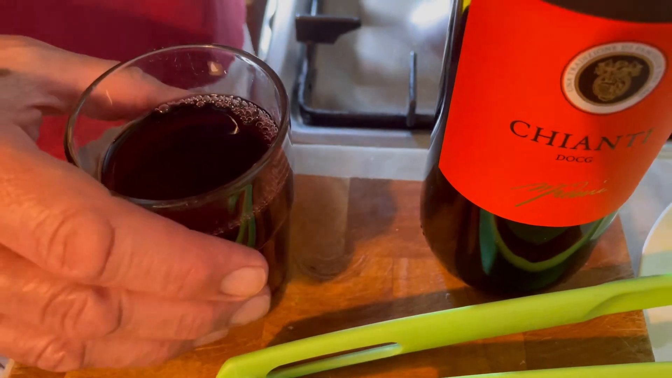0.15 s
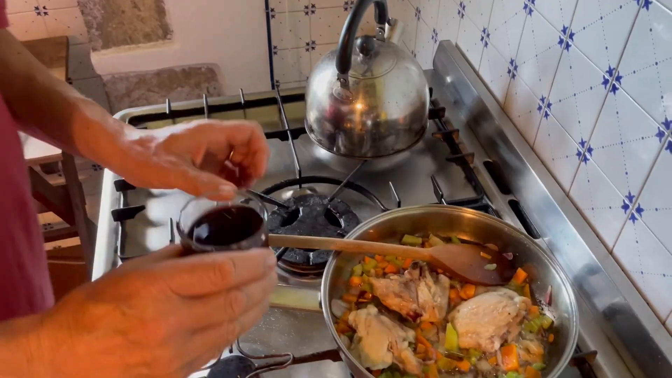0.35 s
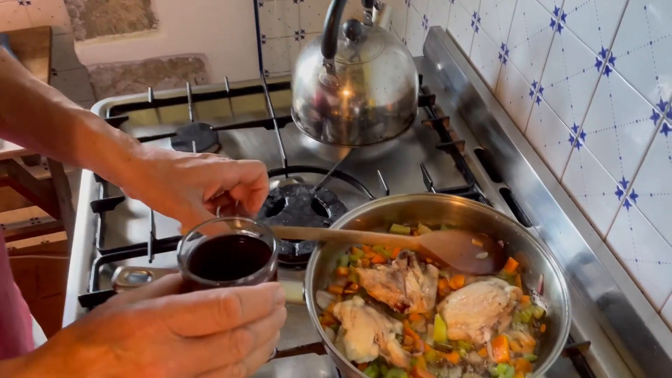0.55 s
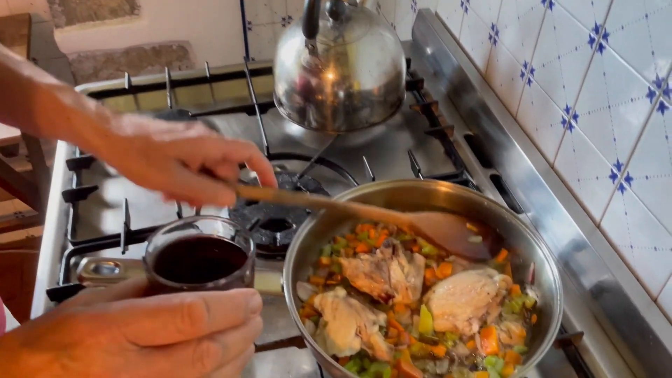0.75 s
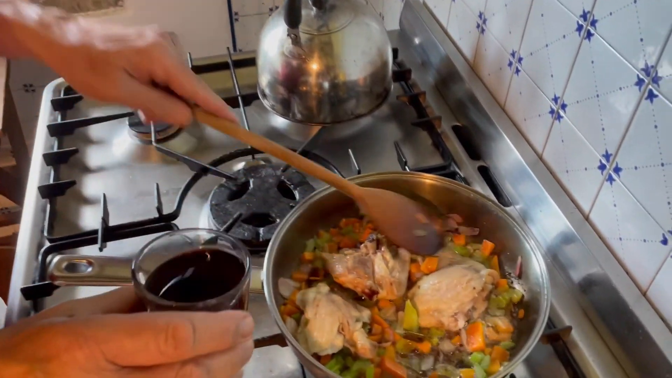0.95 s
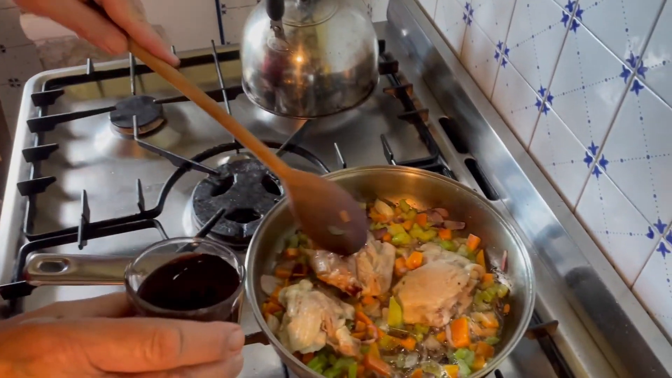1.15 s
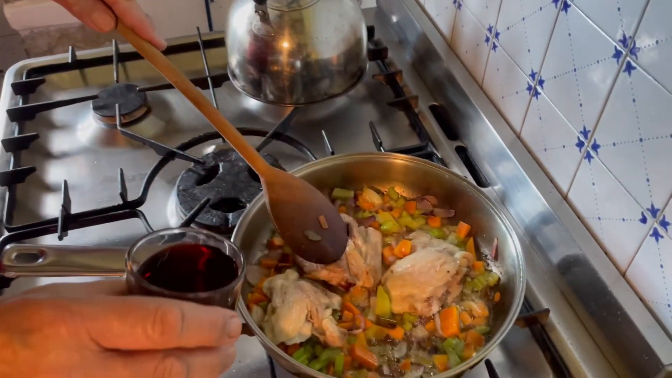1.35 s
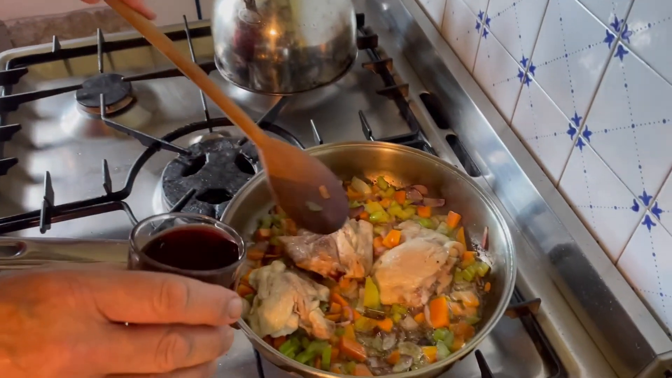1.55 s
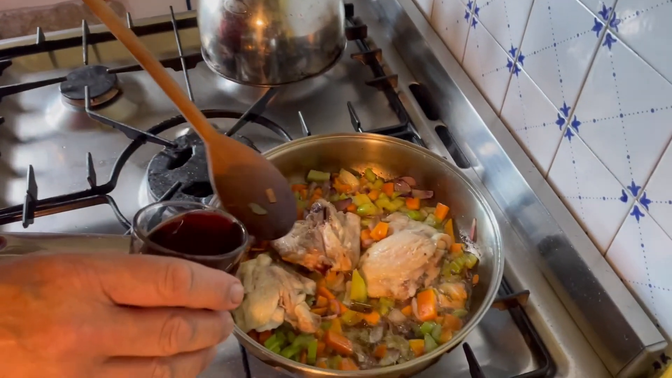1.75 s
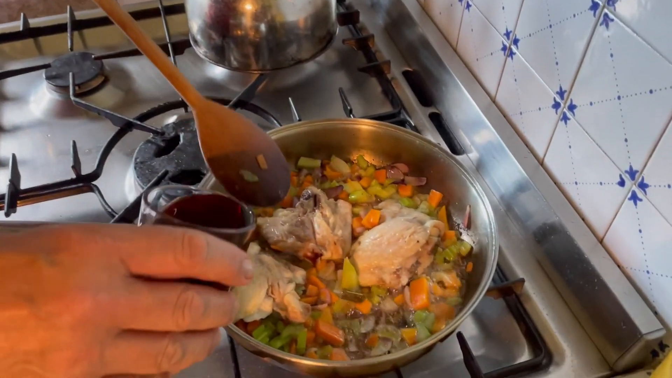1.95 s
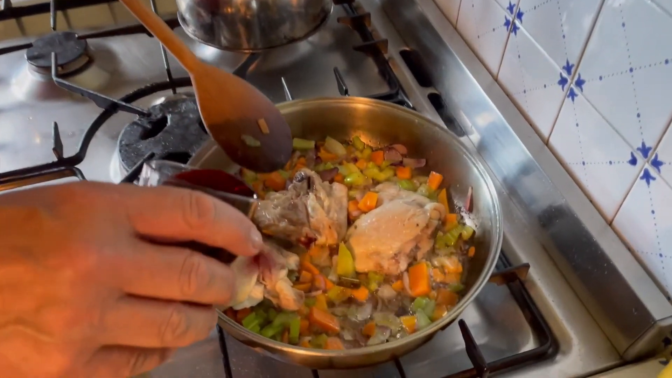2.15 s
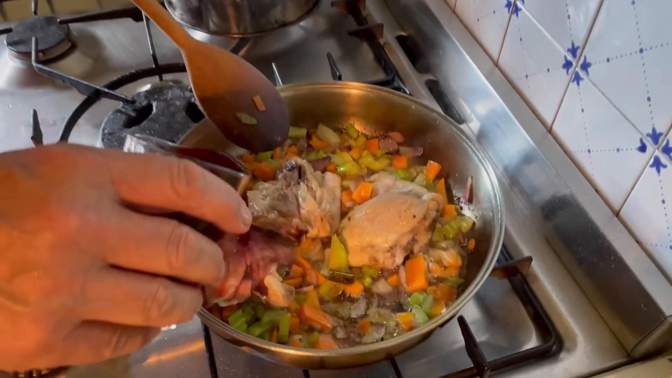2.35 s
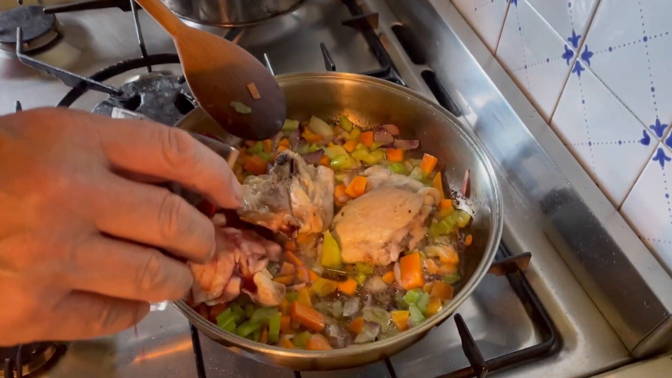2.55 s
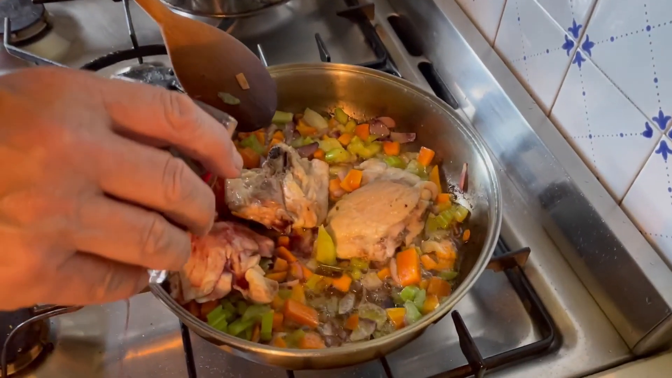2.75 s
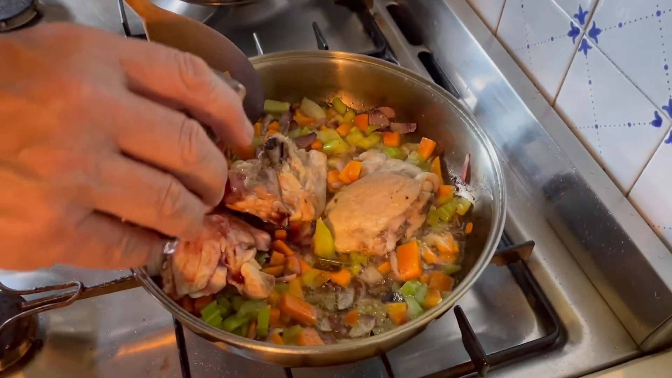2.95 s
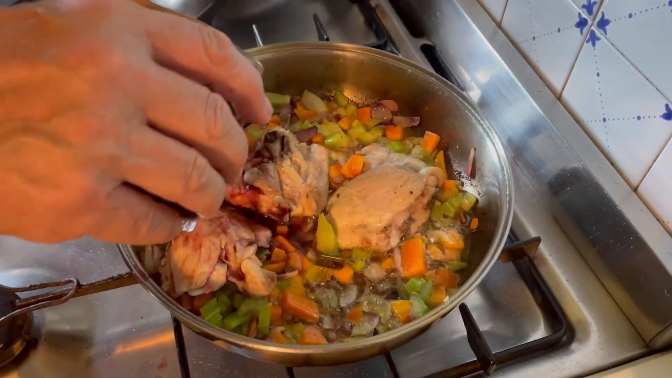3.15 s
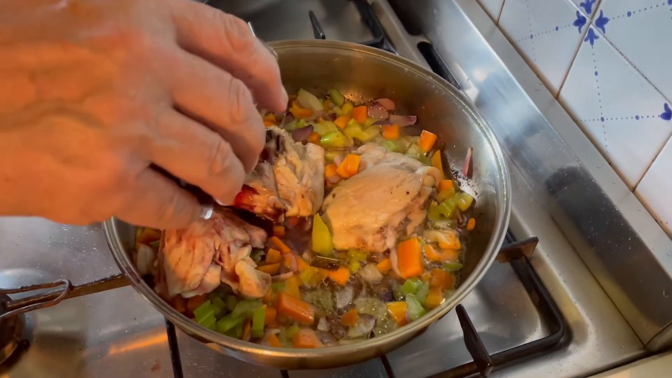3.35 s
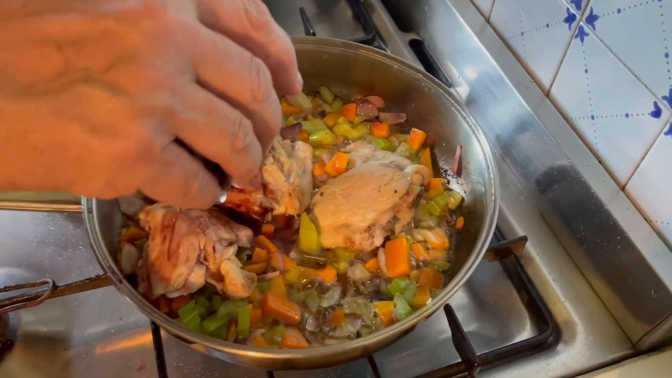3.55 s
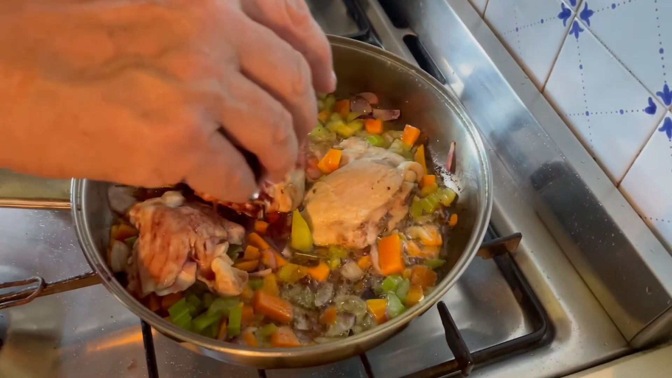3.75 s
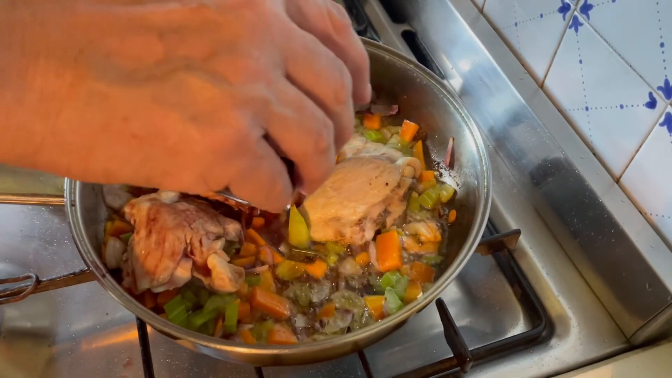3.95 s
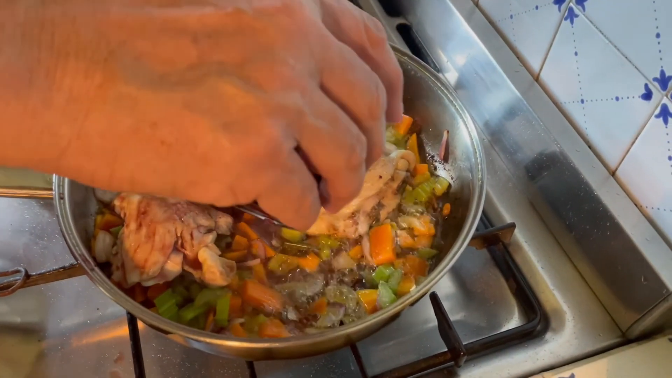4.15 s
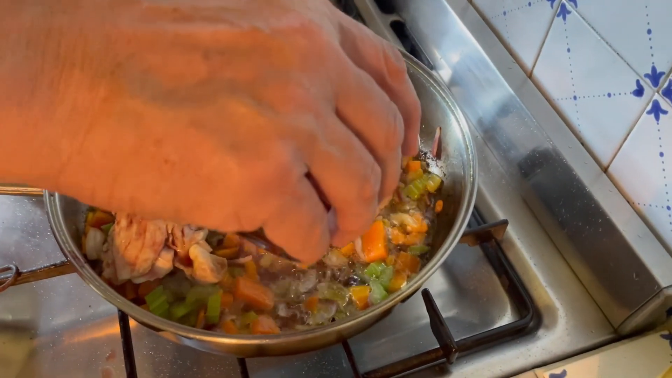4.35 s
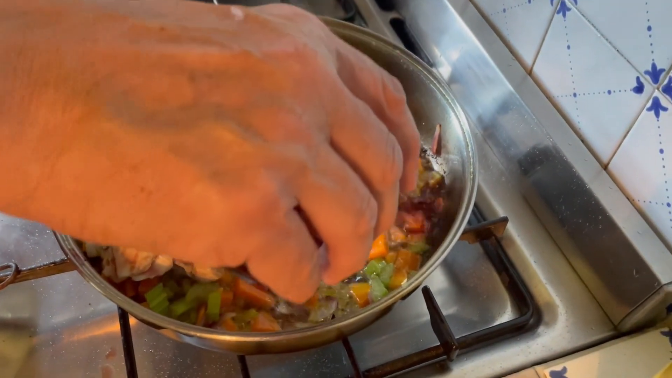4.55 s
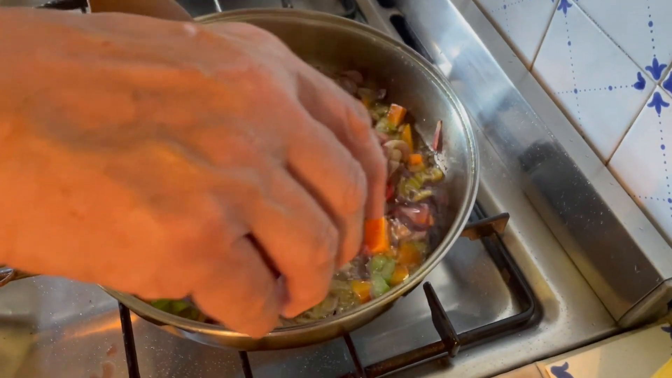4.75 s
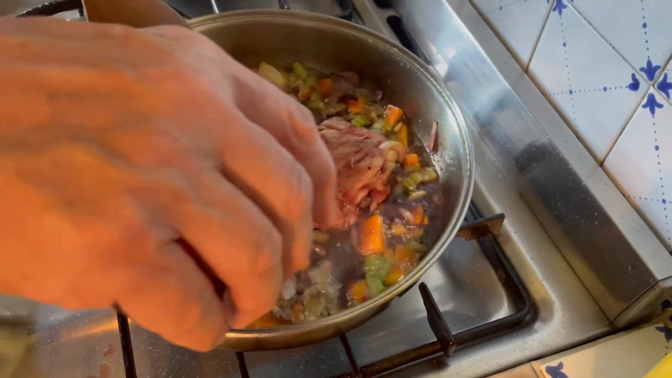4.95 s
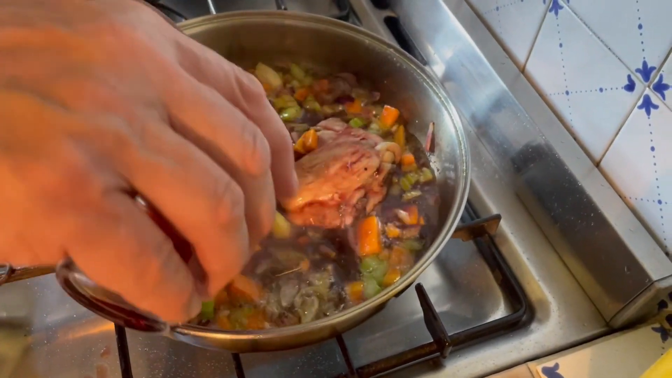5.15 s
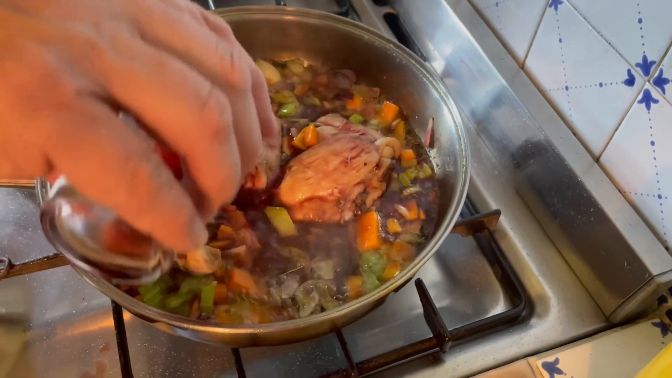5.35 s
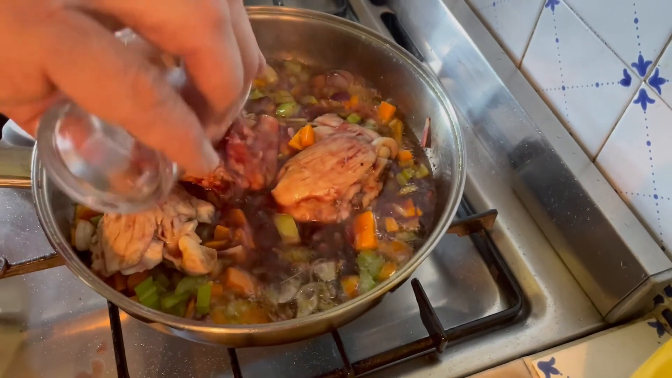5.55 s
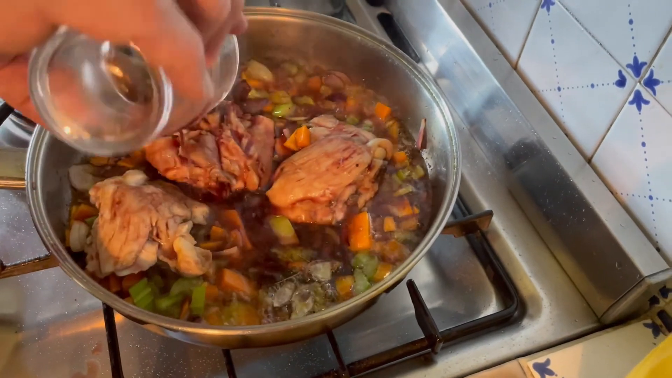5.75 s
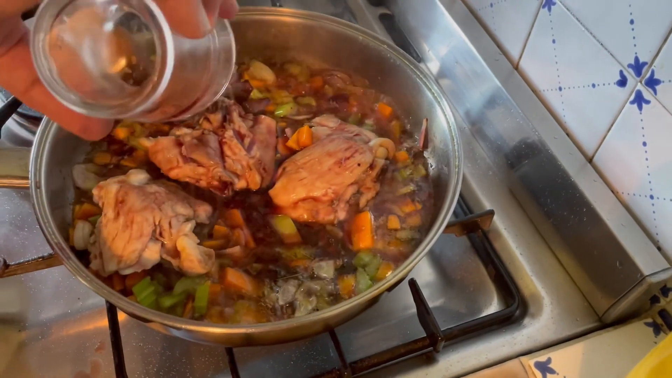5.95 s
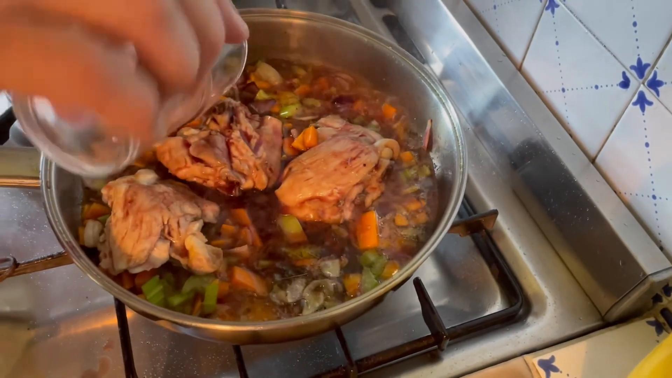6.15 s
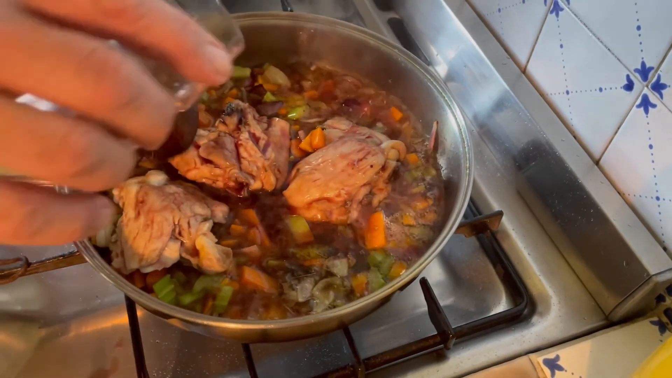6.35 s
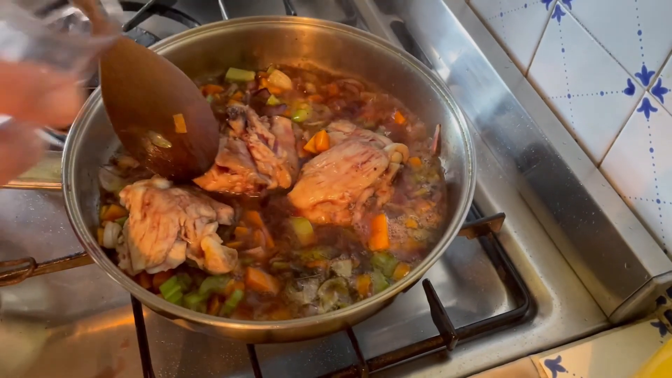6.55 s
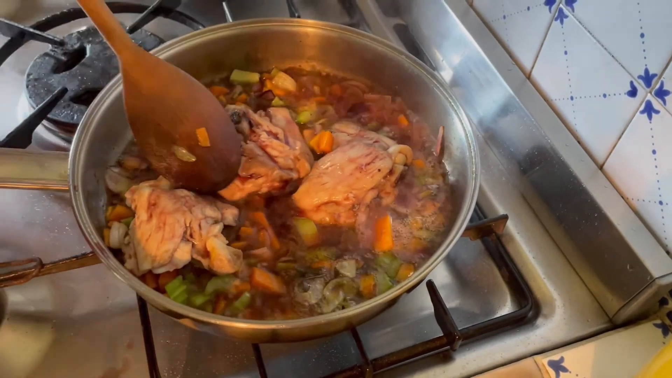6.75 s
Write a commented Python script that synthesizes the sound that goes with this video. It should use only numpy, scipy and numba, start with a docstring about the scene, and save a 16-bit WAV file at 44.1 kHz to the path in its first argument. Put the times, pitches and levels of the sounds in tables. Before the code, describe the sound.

Chicken and chopped vegetables crackle and pop in a hot pan, then wine is poured in and it erupts into a loud, fizzing boil.

```python
"""Meat and vegetables fry in a hot steel pan, close to a phone in a kitchen: swarms of bubble bursts over
filtered noise, the low rumble, drone and hum of flame and room; fat crackles, pops and spits in short rings.
A low thud and wide dry ticks come by; thin squeals of steam, sliding bands of hiss, come around and after the pour.
Wine lands at 2.87 s and boils up from low gurgle to fine fizz: the swarms swell, the pops turn to snaps.
Late on, steam feeds the finest fizz while the spits grow loud enough to clip."""
import sys
import numpy as np
from scipy import signal
from scipy.fft import rfft, irfft
from scipy.io import wavfile
from scipy.ndimage import uniform_filter1d
from numba import njit

SR = 44100
rng = np.random.default_rng(int(sys.argv[2]) if len(sys.argv) > 2 else 0)


def wav_record(signal):
    """Record a signal, one row per channel, as 16-bit PCM in the file named by sys.argv[1]."""
    frames = np.transpose(np.atleast_2d(signal))
    bounded = np.clip(frames, -1, 1)
    # unit amplitude maps onto the largest positive 16-bit level
    quanta = np.round(bounded * 32767).astype(np.int16)
    wavfile.write(sys.argv[1], SR, quanta)


N = 299880
TIME = np.arange(N) / SR
HZ = np.arange(N // 2 + 1) * SR / N + 1e-3  # nudged off zero for the logarithm

# low noise of flame and room, perhaps with distant traffic:
# t/s, deep rumble level/dB, drone level/dB, hum level/dB
LOW_LEVELS = [(0, -40.5, -42, -42.5), (1.4, -44, -46.5, -43), (2.7, -49.5, -44, -44),
              (3.2, -53, -41.5, -46), (3.5, -51, -51, -34), (4.1, -47, -40, -38.5),
              (4.9, -50, -40.5, -38.5), (6.0, -50, -45.5, -37), (6.8, -55, -46.5, -40)]
# resonances that colour each low band: f/Hz, width/Hz, level/dB
RUMBLE_MODES = [(46.2, 9, 0)]
DRONE_MODES = [(80.4, 15, -2.5), (102, 24, -4.5)]
HUM_MODES = [(130.1, 10, 4), (179, 160, -10)]
# bubble sizes, large to small: level band low f/Hz, high f/Hz, middle f/Hz, pitch spread/octaves,
# length/cycles, size scatter/dB before the fry or wine factor, flicker/dB, pitch wander/octaves
BUBBLE_SIZES = [(198, 810, 380, 0.413, 4.85, 2., 1., 0.053), (670, 5400, 1333, 0.34, 6, 2, 0.34, .02),
                (1630, 8100, 2180, 0.23, 7.9, 2, 0.5, .02), (2540, 12600, 3277, 0.29, 6.3, 5, 0.73, 0.059),
                (5130, 6320, 6990, 0.27, 5, 2.5, 1.8, .06), (11500, 14400, 11940, 0.41, 1.88, 5, 1.6, .05)]
# how each size follows frying, wine and steam: frying level/dB, its drift/(dB per s),
# boiling level/dB, share of wine curve/ratio, share of steam curve/ratio
SIZE_LEVELS = [(-49.5, -1, -29, 0.71, 0.2), (-40, 0.13, -21.5, 0.86, 0.0357), (-44.5, 0.1, -21, 1.7, 0.11),
               (-37.5, -0.13, -22, 1, 0.26), (-44, 1, -22.5, 0.77, 0.38), (-54.5, 2, -22.5, -0.33, 1.48)]
# frying in fat, on top of each size's frying level: t/s, level/dB
FRYING = [(0, -1), (.26, -4), (.3, 0.5), (1.5, 1.5), (1.57, -1.5), (2.6, -1.5), (3.0, 2), (4.4, 4.5)]
# boil as the wine spreads over the hot steel, before each size's share: t/s, level/dB
WINE_BOIL = [(2.82, -41), (2.88, -20), (3.1, -14), (3.3, -6), (3.92, -3.5), (4.02, -2), (4.8, -2),
             (5.05, 0.5), (6.19, -.5), (6.22, -2.5), (6.8, -4.5)]
# steam flashing off at the dry rim, before each size's share: t/s, level/dB
RIM_STEAM = [(3.4, -30.5), (4.2, -24), (4.55, -24), (4.61, -6.5), (5.05, -11), (5.5, -6.5), (5.7, -3),
             (6.0, -1), (6.19, -2), (6.22, -5)]
# foam of the third size, coarser at first, then finer: t/s, pitch offset/octaves
FOAM_PITCH = [(3.85, -0.099), (4.0, -0.31), (4.85, -0.14), (4.97, -0.0021), (6.8, 0.034)]
# pan and stove ringing: f/Hz, width/Hz, level/dB
PAN_MODES = [(233.3, 23, 9.5), (330.5, 29, 5.5), (392.4, 20.5, 9.5), (511, 84, 8), (614, 140, 4.5),
             (723, 51, 10), (1316, 130, 3.5), (1640, 810, 3.5), (3700, 320, 1), (5600, 140, 2.5),
             (7730, 1200, -0.5)]
# fat pops, level of the ring alone: t/s, peak level/dB, f/Hz
FAT_POPS = [(0.1394, -23, 3120), (0.209, -12, 2850), (0.281, -23, 2280), (0.3515, -13, 2880),
            (0.387, -22, 2400), (0.396, -19, 2960), (0.542, -19.5, 2900), (0.573, -18.5, 2670),
            (0.6427, -13.5, 3900), (0.66, -19, 2800), (0.7147, -13.5, 2680), (0.734, -23, 2150),
            (0.774, -21, 3000), (0.793, -14, 3050), (0.8255, -18.5, 2640), (0.843, -13.5, 4040),
            (0.9243, -22, 3100), (1.0238, -17, 4700), (1.044, -17, 4230), (1.056, -11, 2820),
            (1.178, -19, 2710), (1.419, -19, 2680), (1.5194, -17, 2720), (1.6678, -20, 4110),
            (1.686, -26, 3000), (1.7468, -20, 2900), (1.775, -20, 3000), (1.783, -21, 2900),
            (1.98, -22, 3700), (2.044, -16.5, 2190), (2.178, -17, 3050), (2.1966, -9.5, 2940),
            (2.2586, -12.5, 3200), (2.272, -19, 3180), (2.287, -25, 1320), (2.669, -20, 2990),
            (2.8697, -13, 4870), (2.887, -12.5, 3300), (2.908, -15, 5000), (2.929, -20.5, 1920),
            (3.073, -15, 4330), (3.098, -18, 2600), (3.153, -12, 4600), (3.223, -16, 3600),
            (3.304, -21, 3450), (4.1977, -8.5, 2920)]
# sharp spits of fat: t/s, peak level/dB
FAT_SPITS = [(0.6414, -11), (1.6352, -10.5), (1.7584, -6.5), (2.154, -1), (2.598, -4), (2.6878, -7),
             (3.6795, -3), (3.7764, 2), (3.8018, -3), (4.1879, -1), (4.2223, -3), (5.0539, 8), (5.1921, 4),
             (5.5315, 10), (5.7029, 4)]
# one low thud: t/s, peak level/dB, f/Hz, length/cycles
LOW_THUD = [(.835, -21.5, 49.5, 2.1)]
# wide, dry pops of very few cycles: t/s, peak level/dB, f/Hz
DRY_TICKS = [(1.7587, -14, 2980), (2.376, -7, 2600), (2.456, -10, 4200), (2.5224, -13, 2800),
             (2.598, -2, 3580)]
# steam squealing out from under the food, before wavering and swell:
# start t/s, length/s, first f/Hz, last f/Hz, width/Hz, level/dB
STEAM_SQUEALS = [(2.74, 0.5, 4880, 4680, 400, -33.5), (2.83, 0.17, 5100, 5250, 440, -39),
                 (2.61, 0.99, 6100, 5800, 500, -38), (3.25, 0.086, 3400, 3480, 230, -31),
                 (3.71, 0.24, 2920, 2800, 280, -31.5)]
# two microphone ports: f/Hz, phase by which left leads/rad
PORT_LEAD = [(0, 0.1), (690, 0), (2070, -0.2), (3100, 0.96), (4650, 0), (5680, 0.3), (6120, -0.8),
             (6630, -3.3), (7490, -3.2), (8180, -3.6), (10400, -6.1), (11600, -6.4), (13900, -9.3),
             (15200, -9.5)]
# f/Hz, left minus right level/dB
PORT_TILT = [(60, -1.5), (250, 1.5), (400, -3.5), (700, 4.5), (1300, 3.5), (2000, 0.4), (3500, 3.5),
             (5500, 3.5), (6300, 2), (6700, 0), (16000, 0)]
# f/Hz, likeness of the ports/0-1
PORT_LIKENESS = [(60, 1), (300, 0.97), (440, 0.85), (600, 0.49), (900, 0.38), (1300, 0.78), (2100, 0.88),
                 (3400, 0.57), (4600, 0.92), (5600, 0.66), (6250, 0.33), (6900, 1), (9500, 0.76),
                 (11000, 0.79), (12500, 0.53), (14300, 1)]

POUR_S, SOAK_S = 2.87, 0.64  # the wine lands, then soaks the pan
EVENED_SHARE = 0.22  # share of the swells of each low band that is evened out
BURSTS_PER_CYCLE = 3.0  # bursts per second for each Hz of middle pitch
FRY_SCATTER, WINE_SCATTER = 1.2, 0.79  # factors on size scatter: wine evens the bursts out
LOUDEST_DB, SURGE_DB = 20.5, 0.65  # cap on one burst; surge shared by all sizes
FOAM_EDGE_OCTAVES = 0.26  # foam sizes stay within this reach of the middle
CRACKLES_PER_S, CRACKLE_RISE_S = 200, 0.088
CRACKLE_FRY_DB, CRACKLE_WINE_DB = -26.5, -19.5  # before size and flurries
FLURRY_FRY_DB, FLURRY_WINE_DB = 2.5, 1.5
BURST_DELAY_S = 0.0003  # added to every timed burst
POP_CYCLES, WET_POP_CYCLES = 6.3, 1.9  # pops in the wine snap rather than ring
POP_MID_HZ = 3000  # dry pops above it ring fewer cycles
SNAP_DB, SNAP_CYCLES = 4, 1.26  # snap level is relative to the ring
SPIT_HZ, SPIT_CYCLES, TICK_CYCLES = 9000, 2, 1.37
ROOM_T60_S, TOP_HZ = 0.063, 15700


def undb(db):
    """Decibels to gain."""
    return 10 ** (np.asarray(db) / 20)


def over_time(table):
    """Draw a (t, value) table across every sample."""
    return np.interp(TIME, *np.transpose(table))


def over_hz(table):
    """Draw a (f, value) table across every frequency bin, on a log axis."""
    hz, value = np.transpose(table)
    return np.interp(np.log(HZ), np.log(hz + 1e-3), value)


def after_pour(s, rise_s, dry, wet):
    """Slide a setting from its dry to its wet state once the wine lands."""
    return dry + (wet - dry) * np.clip((s - POUR_S) / rise_s, 0, 1)


def walk(rate):
    """Random levels, one every 1 / rate s, slewed into each other; spread near 1."""
    k = int(SR / rate)
    held = np.repeat(rng.standard_normal(N // k + 1), k)
    return uniform_filter1d(held, k)[:N]


def flicker():
    """A quick walk without slow swells."""
    quick = walk(32)
    return quick - uniform_filter1d(quick, size=SR // 7)


def resonance(hz, width):
    """Bell-shaped peak of one resonance over frequency."""
    return 1 / (1 + (2 * (HZ - hz) / width) ** 2)


@njit
def ring(at, hz, cycles, size, n):
    """Each burst swells and dies as t^2 exp(-t), peak = size, its pitch sliding up as the bubble opens."""
    out = np.zeros(n)
    for k in range(len(at)):
        tau = cycles[k] / hz[k] * SR / 6  # samples
        turn = np.exp(2j * np.pi * hz[k] / SR - 1 / tau)
        glide = np.exp(2j * np.pi * hz[k] / SR * .015 / tau)
        z = size[k] * np.e ** 2 / 4 + 0j
        start = int(at[k] * SR)
        for j in range(min(int(8 * tau) + 2, n - start)):
            out[start + j] += (j / tau) ** 2 * z.imag
            z, turn = z * turn, turn * glide
    return out


def bursts(table, *columns):
    """Play rows of (t, peak dB, ..) completed by the pitch and cycles that the table lacks."""
    s, db, *own = np.transpose(table)
    hz, cycles = (np.full(len(s), 1.0) * c for c in (*own, *columns))
    return ring(s + BURST_DELAY_S, hz, cycles, undb(db), N)


def ports(apart):
    """Response of both ports: a shared part, and a part that each port hears alone."""
    like = np.clip(over_hz(PORT_LIKENESS), 0, 1)
    half = np.array([[.5], [-.5]])  # left, right
    shared = np.exp(1j * half * over_hz(PORT_LEAD))
    tilt = undb(half * over_hz(PORT_TILT))
    return tilt * (np.sqrt(like) * shared + np.sqrt(1 - like) * apart)


def heard(spectrum, lo_hz, hi_hz):
    """Back to sound, with the centre image at rms 1 inside a band."""
    band = spectrum.mean(axis=0)[(HZ > lo_hz) & (HZ < hi_hz)]
    return irfft(spectrum, N) * N / np.sqrt(2 * np.sum(np.abs(band) ** 2))


def low_rumble(mic):
    """Low rumble, drone and hum of flame and room, perhaps with distant traffic: noise in narrow bands."""
    s, *levels = np.transpose(LOW_LEVELS)
    out = 0
    for level_db, modes in zip(levels, (RUMBLE_MODES, DRONE_MODES, HUM_MODES)):
        shape = sum(undb(db) * resonance(hz, width) for hz, width, db in modes)
        noise = heard(mic * shape * rfft(rng.standard_normal(N)), 30, 210)
        swell = uniform_filter1d(noise.mean(axis=0) ** 2, size=SR // 20) + .05
        steadied = noise / swell ** (EVENED_SHARE / 2)
        out = out + undb(np.interp(TIME, s, level_db)) * steadied
    return out


def bubble_swarm(mid_hz, spread, cycles, scatter_db, wander, foam):
    """Bubbles of one size class burst at random; small ones burst more often."""
    count = int(mid_hz * BURSTS_PER_CYCLE * N / SR)
    when, luck = rng.random((2, count))
    at = when * N / SR
    # the typical size wanders as the liquid moves about
    octaves = spread * rng.standard_normal(count) + wander * walk(15)[(when * N).astype(int)]
    if foam:
        octaves = FOAM_EDGE_OCTAVES * np.tanh(octaves / FOAM_EDGE_OCTAVES)
        octaves = octaves + np.interp(at, *np.transpose(FOAM_PITCH))
    hz = np.clip(mid_hz * 2 ** octaves, 60, 18000)
    # a few bursts are far louder than the rest; the scaling holds mean power near 1
    scatter = scatter_db * after_pour(at, SOAK_S, FRY_SCATTER, WINE_SCATTER)
    wild = np.clip(scatter * np.log(10) / 10, 0, .9)
    size = np.minimum((1 - luck) ** (-wild / 2), undb(LOUDEST_DB)) * np.sqrt(1 - wild)
    return ring(at, hz, np.full(count, cycles), size, N)


def boil(mic):
    """Frying, then boiling wine: bubble swarms coloured by the pan surge together and flicker alone."""
    fry, wine, steam = over_time(FRYING), over_time(WINE_BOIL), over_time(RIM_STEAM)
    pan = undb(sum(db * resonance(hz, width) for hz, width, db in PAN_MODES))
    out, surge = 0, flicker()
    for k, (bubble, follow) in enumerate(zip(BUBBLE_SIZES, SIZE_LEVELS)):
        lo_hz, hi_hz, mid_hz, spread, cycles, scatter_db, flicker_db, wander = bubble
        fry_db, drift_db, boil_db, wine_share, steam_share = follow
        frying = undb(fry_db + drift_db * TIME + fry)
        boiling = undb(boil_db + wine_share * wine + steam_share * steam)
        swarm = bubble_swarm(mid_hz, spread, float(cycles), scatter_db, wander, foam=k == 2)
        gain = np.hypot(frying, boiling) * undb(SURGE_DB * surge + flicker_db * flicker())
        out = out + gain * heard(mic * pan * rfft(swarm), lo_hz, hi_hz)
    return out


def crackle(scatter_db=3.0, low_hz=2600.0, octaves=2.07):
    """Water droplets burst in the fat: short clicks, mostly near one pitch, in flurries that share it."""
    when, luck, tone, length = rng.random((4, int(CRACKLES_PER_S * N / SR)))
    s, sample = when * N / SR, (when * N).astype(int)
    db = after_pour(s, CRACKLE_RISE_S, CRACKLE_FRY_DB, CRACKLE_WINE_DB)
    db = db + np.minimum(-scatter_db * np.log(1 - luck), 6.5)
    db = db + after_pour(s, SOAK_S, FLURRY_FRY_DB, FLURRY_WINE_DB) * walk(12)[sample]
    hz = low_hz * 2 ** (octaves * tone ** 3 + 0.17 * walk(14)[sample])
    cycles = 1.27 + 3.6 * length ** 2
    return bursts(np.transpose([s, db, hz, cycles]))


def fat_pops():
    """A pop opens with a wide snap while its cavity rings, long in fat and short in wine."""
    s, _, hz = np.transpose(FAT_POPS)
    dry_cycles = POP_CYCLES * np.minimum(POP_MID_HZ / hz, 1)
    cycles = after_pour(s, CRACKLE_RISE_S, dry_cycles, WET_POP_CYCLES)
    return bursts(FAT_POPS, cycles) + undb(SNAP_DB) * bursts(FAT_POPS, SNAP_CYCLES)


def spits():
    """Sharp spits of fat: very short, bright bursts."""
    return bursts(FAT_SPITS, SPIT_HZ, SPIT_CYCLES)


def thud():
    """One low burst of about two cycles."""
    return bursts(LOW_THUD)


def ticks():
    """Dry pops of so few cycles that each is a wide tick with little pitch."""
    return bursts(DRY_TICKS, TICK_CYCLES)


def squeals(mic):
    """Escaping steam: narrow bands of hiss that slide in pitch, swell, sputter and fade."""
    out = 0
    for start, length, from_hz, to_hz, width_hz, db in STEAM_SQUEALS:
        done = np.clip((TIME - start) / length, 0, 1)
        hz = from_hz + (to_hz - from_hz) * done + 0.15 * width_hz * walk(40)
        tone = np.exp(2j * np.pi * np.cumsum(hz) / SR)
        # slow noise on both phases of the tone widens it into hiss
        flutter = [irfft(rfft(rng.standard_normal(N)) * resonance(0, width_hz), N) for _ in range(2)]
        hiss = tone.real * flutter[0] + tone.imag * flutter[1]
        swell = np.sin(np.pi * done).clip(0) ** 0.42
        gain = swell * undb(db + 2.5 * flicker())
        out = out + gain * heard(mic * rfft(hiss), 2000, 6500)
    return out


def scene():
    """Everything reaches the two ports of the phone."""
    # steady sounds: each port also hears the same sound at an unrelated moment
    shift = np.array([[N // 3], [2 * N // 3]])  # samples
    spread = ports(np.exp(-2j * np.pi * np.arange(len(HZ)) * shift / N))
    # single bursts: each port gets its own short room tail
    tail = rng.standard_normal((2, N)) * np.exp(-np.log(1000) * TIME / ROOM_T60_S)
    point = ports(rfft(tail / np.sqrt(np.sum(tail ** 2, axis=1, keepdims=True))))
    steady = low_rumble(spread) + boil(spread) + squeals(spread)
    singles = crackle() + fat_pops() + spits() + thud() + ticks()
    return steady + irfft(point * rfft(singles), N)


def record(dry):
    """The phone cuts the deepest bass, clips at full scale and cuts the top."""
    bass_cut = signal.butter(6, 36, "high", fs=SR, output="sos")
    top_cut = signal.ellip(14, .2, 80, TOP_HZ, fs=SR, output="sos")
    clipped = np.clip(signal.sosfilt(bass_cut, dry), -1, 1)
    return signal.sosfilt(top_cut, clipped)


dry = scene()
out = record(dry)
wav_record(out)
```